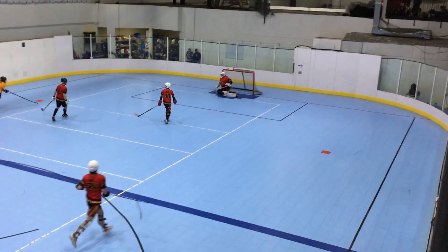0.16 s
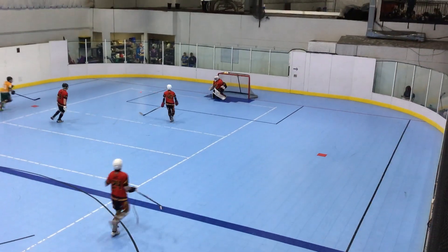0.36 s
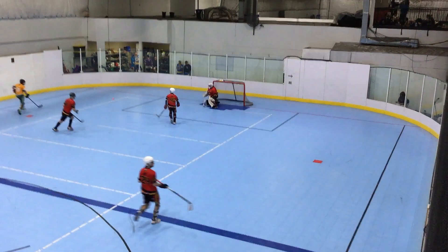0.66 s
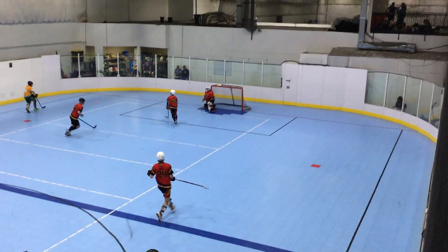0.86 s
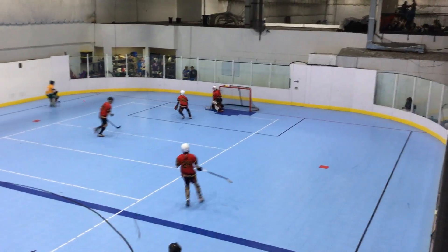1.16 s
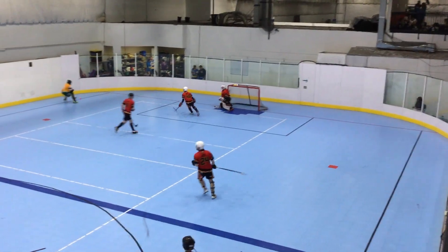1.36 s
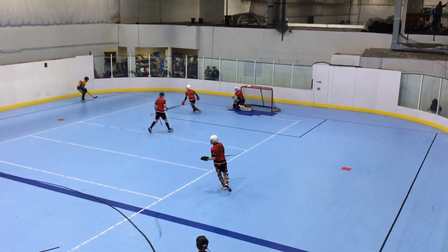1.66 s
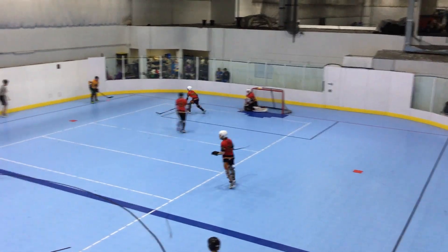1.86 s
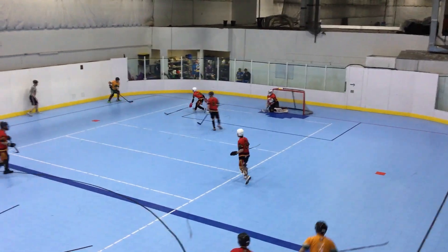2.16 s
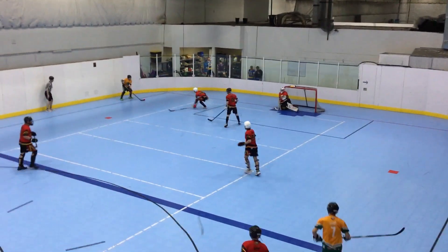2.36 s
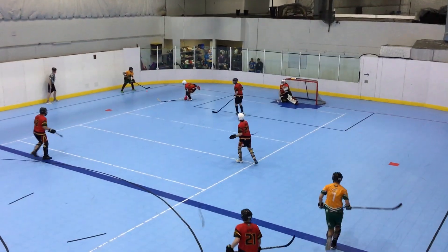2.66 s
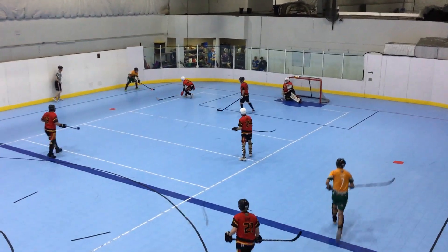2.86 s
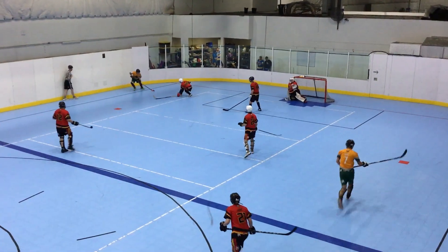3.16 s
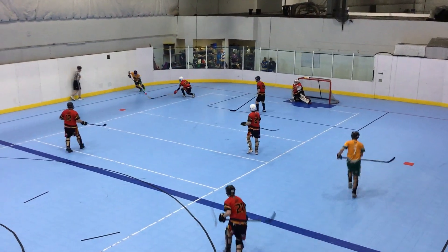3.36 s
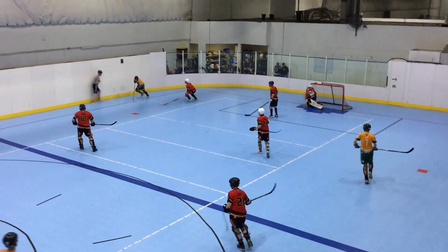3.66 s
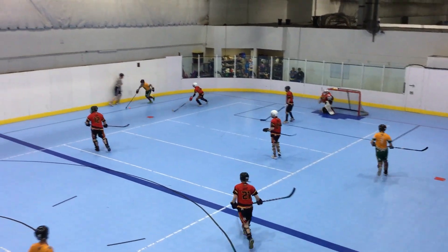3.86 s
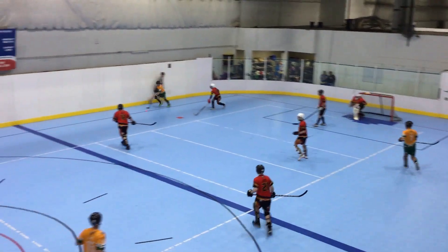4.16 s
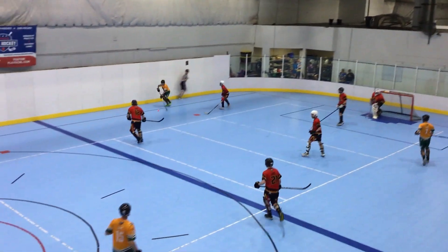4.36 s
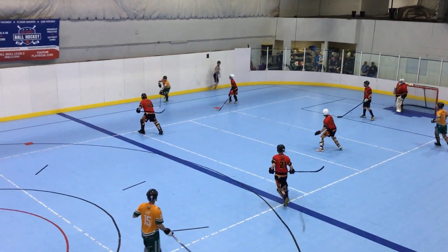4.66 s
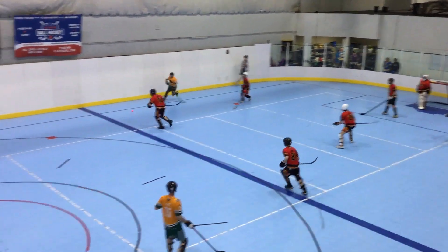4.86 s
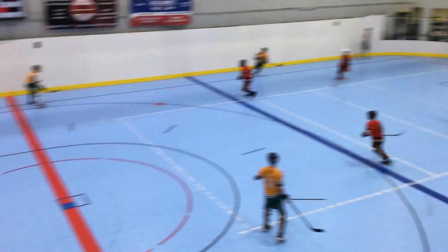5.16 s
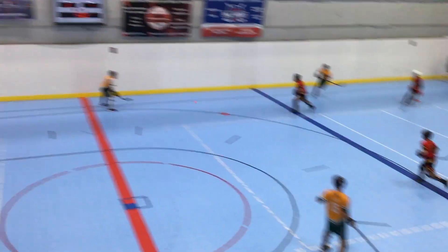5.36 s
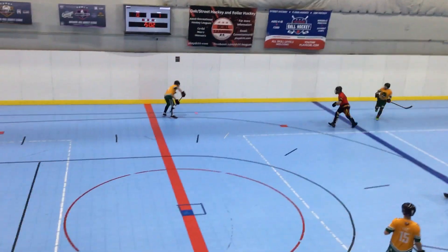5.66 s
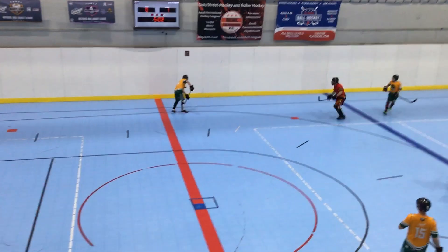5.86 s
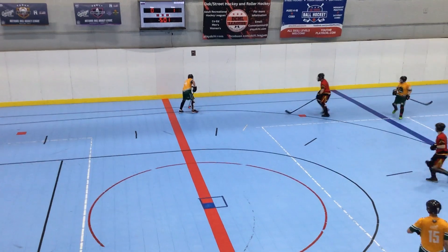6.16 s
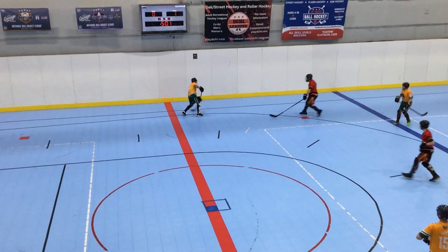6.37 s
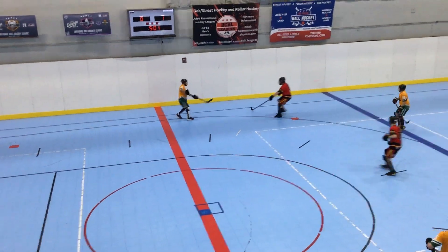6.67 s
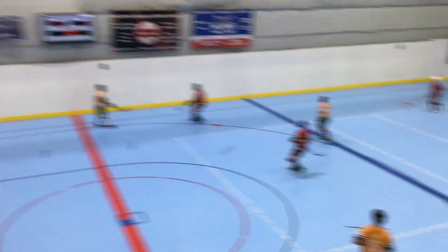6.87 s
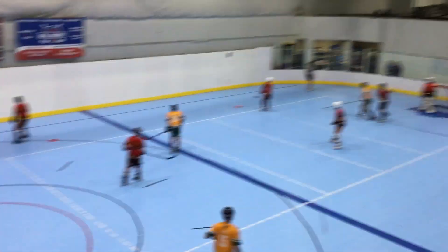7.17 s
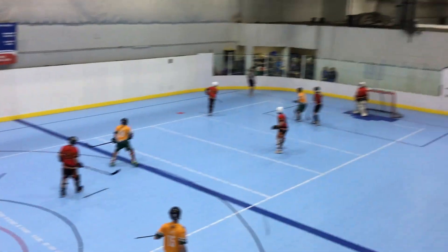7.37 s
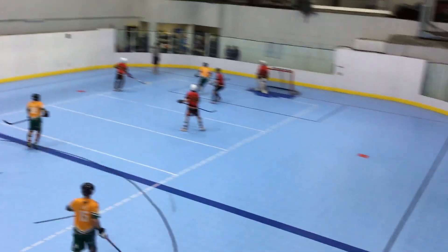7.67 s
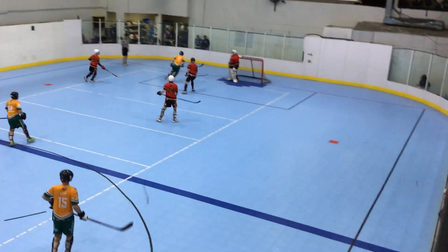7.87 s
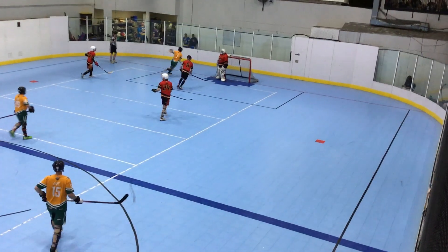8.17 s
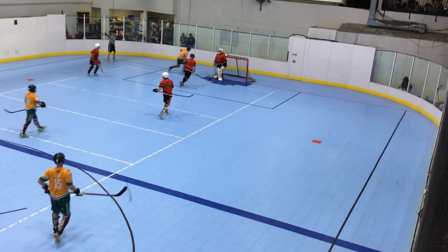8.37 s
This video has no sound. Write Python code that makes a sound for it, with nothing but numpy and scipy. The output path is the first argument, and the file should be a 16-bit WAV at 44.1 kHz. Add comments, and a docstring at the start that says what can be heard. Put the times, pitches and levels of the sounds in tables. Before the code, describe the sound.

Fingers bump and rub a camera housing in irregular thuds and clicks, while an echoing indoor ball hockey game clacks and squeaks faintly behind.

```python
"""A camera pans by hand above an indoor ball hockey court, over steady air noise, hiss and a low drone.
From the start, fingers and mount slip on its housing: each slip steps the pressure at the microphone,
and the camera's filters smear every step into a falling knock; skin rubs and rustles in between.
Far below in the echoing hall, shoes squeak as unsteady tones with an octave, and between them sticks
clack as noisy cracks with a damped ring; near the end a whistle blows four wavering tones."""
import sys
import numpy as np
from scipy import signal
from scipy.fft import rfft, irfft
from scipy.io import wavfile
from scipy.ndimage import uniform_filter1d

SR = 44100
rng = np.random.default_rng(int(sys.argv[2]) if len(sys.argv) > 2 else 0)


def gain_from_db(level_db):
    """Turn a decibel level (scalar or array-like) into a linear amplitude factor."""
    decades = np.asarray(level_db, float) / 20
    return 10 ** decades


def digitize_waveform(pressure):
    """Quantize a signal to 16-bit integers and store it at the path in sys.argv[1].

    Rows of a 2-D input are taken as channels; values are limited to [-1, 1].
    """
    field = np.atleast_2d(pressure).T
    bounded = np.clip(field, -1, 1)
    quanta = np.round(bounded * 32767).astype(np.int16)
    wavfile.write(sys.argv[1], SR, quanta)


N = 376173

# Unrest of the grip. Each row: time in seconds, slow rubbing in dB, fine unrest in dB.
GRIP = [(0, -44, -79.5), (.55, -50, -70), (1.0, -40, -74), (1.38, -42.5, -72.5), (2.09, -46, -77),
        (2.62, -52.5, -77.5), (3.16, -41.5, -77.5), (3.92, -44, -74.5), (4.44, -43.5, -75.5),
        (4.94, -40, -73.5), (5.5, -43.5, -81.5), (6.2, -51, -75.5), (6.75, -48, -82), (6.89, -48, -55.5),
        (7.1, -36, -65.5), (7.66, -42.5, -67.5), (7.85, -47, -80.5), (8.53, -44.5, -79.5)]
# Colour of the rubbing. Each row: frequency in Hz, relative density in dB.
RUBBING_COLOUR = [(20, 5.5), (40, 15.5), (70, 16.5), (120, -4), (250, -18.5), (500, -41), (1000, -59)]
# Colour of skin sliding. Each row: frequency in Hz, relative density in dB.
RUSTLE_COLOUR = [(150, -18), (300, 1), (700, -2), (1500, -15.5), (4000, -32.5), (9000, -40.5)]
# Colour of air noise and hiss. Each row: frequency in Hz, relative density in dB.
HISS_COLOUR = [(180, -32), (300, -4), (419, -11.5), (644, -13.5), (1060, -15.5), (2580, -22.5),
               (9070, -30.5), (12300, -36.5), (13500, -60.5)]
# Colour of the building drone. Each row: frequency in Hz, relative density in dB.
RUMBLE_COLOUR = [(20, -1), (35, -2.5), (50, 4), (70, -18.5), (100, -40), (200, -60)]
HISS_DB, RUMBLE_DB = -78.5, -51
RUSTLE_OVER_UNREST_DB, TINY_OVER_UNREST_DB = -6.5, 26.5

# Crisp slips of the mount. Each row: start in seconds, pressure step in dB, direction +1 or -1,
# sudden share 0-1, edge in Hz.
SNAPS = [(.0776, -7, 1, 0.13, 1990), (0.1739, -21, 1, 0.25, 1975), (.26, -17.5, 1, 0.27, 3794),
         (0.6655, -18.5, -1, 0.3, 3236), (0.7413, -24, 1, 0.29, 2366), (.8101, -17, -1, 0.27, 4000),
         (0.964, -2, -1, .13, 1810), (1.1737, -27.5, -1, 0.18, 4101), (1.2312, -25, 1, 0.32, 4172),
         (1.3339, -10, 1, 0.33, 3000), (1.4155, -31.5, 1, 0.26, 3381), (1.4967, -22.5, 1, 0, 597),
         (2.094, -24, 1, 0.29, 3053), (2.4122, -14, 1, .26, 4050), (2.8857, -35, 1, 0.5, 1011),
         (3.1227, -5, 1, 0.24, 2440), (3.23, -9.5, 1, 0.27, 3180), (3.661, -34, 1, 0.22, 3580),
         (3.9505, -34, 1, 0.47, 1103), (4.6953, -30, 1, .01, 3870), (4.8469, -31.5, 1, 0.35, 3870),
         (5.344, -33, -1, 0.3, 3872), (5.9324, -12, -1, .3, 4460), (6.11, -23.5, -1, 0.23, 3077),
         (6.4481, -7.5, 1, .1, 2010), (6.846, -14, 1, 0.25, 4000), (6.8507, -18, -1, 0.05, 810),
         (6.9167, -24.5, -1, .02, 900), (6.973, -21, 1, 0.24, 3948), (7.0771, -16.5, 1, .08, 1010),
         (7.191, -24.5, 1, 0, 4669), (7.2011, -17, 1, .1, 1100), (7.2952, -32, 1, 0.1, 4941),
         (7.31, -3, 1, 0.32, 4630), (7.3834, -5, 1, 0.18, 2710), (7.471, -16.5, -1, .3, 3920),
         (7.5508, -29.5, -1, 0.24, 4630), (7.5747, -7.5, -1, 0.16, 3498), (7.5786, -2.5, -1, 0.21, 2340),
         (7.5827, -3, -1, 0.06, 2180), (7.5892, -8, -1, 0.15, 3000), (7.6913, -16, 1, .23, 3350)]
# Padded bumps of a finger. Each row: start in seconds, pressure step in dB, direction +1 or -1,
# creep time in ms, sudden share 0-1.
BUMPS = [(.0094, -22.5, 1, 1.03, 0), (0.2401, -8.5, -1, 3.3, 0.1), (.296, -41, 1, .6, .5),
         (0.7256, -19.5, -1, 1.4, .05), (1.129, -42, 1, .6, 0.9), (1.534, -42, 1, 0.68, 0.4),
         (1.649, -36.5, 1, 0.49, 0.4), (1.767, -46, 1, .6, .5), (1.808, -41.5, 1, 0.5, 0.5),
         (1.8737, -33, -1, 0.65, 0.44), (1.92, -41, 1, .6, .6), (2.264, -48, 1, .6, .6),
         (2.365, -41, 1, .6, 0.4), (2.434, 5, 1, 2.33, 0.13), (2.595, -36.5, 1, .6, 0.6),
         (2.6613, 1.5, 1, 0.58, 0.79), (2.8332, -24.5, -1, 0.59, .01), (2.865, -37, 1, .6, 0.4),
         (3.497, -40, 1, 0.72, 0.8), (3.528, -42, 1, 0.67, 0.8), (3.9021, -14.5, -1, 0.64, .01),
         (4.103, -41.5, 1, .6, .7), (4.2842, -21, 1, 1.2, 0), (4.4167, -24, -1, 0.96, 0.14),
         (4.7979, -21, -1, 0.82, .01), (4.9583, -27, 1, 1.2, 0.37), (5.0333, -14, 1, .4, 0.72),
         (5.0887, -20, -1, 1.1, .01), (5.725, -43.5, 1, .6, 0.4), (6.401, -39, 1, .6, .5),
         (6.653, -30.5, 1, 1.1, 0.05), (6.8834, 1.7, -1, 1.34, 0.38), (6.9095, -1, -1, 0.82, 0.2),
         (6.9651, -18.5, -1, 0.68, 0), (7.1172, -21.5, 1, 1.4, 0.27), (7.2421, -13, 1, 0.2, 0.77),
         (7.7354, -27.5, -1, 0.9, 0), (7.9479, 9.5, -1, 6, 0.05), (8.235, -32.5, 1, 0.75, .1)]
# Slow squeezes of the palm. Each row: middle of the build-up in seconds, pressure step in dB,
# direction +1 or -1, build-up in ms.
SQUEEZES = [(0.5334, -17, -1, 3.4), (1.0455, -13.5, -1, 5.7), (1.7075, -12.5, 1, 2.4),
            (1.9333, -16, -1, 2.3), (2.457, -11, -1, 3.8), (2.8425, -11, -1, 5), (2.8516, -15, 1, 4.6),
            (3.601, -7, 1, 7.3), (3.895, -5.5, -1, 2), (3.9107, -9, -1, 6.3), (3.927, -14, -1, 6.6),
            (4.0499, -8.5, 1, 6.9), (4.2, -18.5, 1, 5.1), (4.2898, -11, -1, 5.3), (4.4169, -23, -1, 5),
            (4.5044, -19.5, -1, 7), (4.7435, -24, 1, 6), (4.804, -2, 1, 3.1), (4.8353, -5, 1, 6.6),
            (4.89, -14, 1, 4.4), (4.9056, -7, -1, 6), (4.929, -16, 1, 4), (4.9433, -14, -1, 4),
            (4.9585, -18, 1, 4.8), (4.981, -14, -1, 6.9), (5.0984, -10.5, 1, 3.3), (5.2838, -16, -1, 4.9),
            (5.498, -15, -1, 9.2), (5.59, -15, -1, 7.3), (6.6676, -14, 1, 8), (6.721, -9, 1, 5.6),
            (6.742, -5.5, -1, 13), (6.871, -8, -1, 2.8), (6.937, -10.5, 1, 1.8), (6.9948, -9, 1, 1.8),
            (7.0056, -12.5, 1, 3), (7.0166, -8, 1, 1.7), (7.0413, -14.5, -1, 4), (7.085, -7, -1, 4.5),
            (7.104, -13, -1, 3.5), (7.1272, -13, -1, 1.6), (7.1477, -14, 1, 5), (7.1738, -15, 1, 3.6),
            (7.265, -13, -1, 6.5), (7.4188, -13.5, 1, 5), (7.4965, -13, -1, 5), (7.5283, -3.5, -1, 6),
            (7.535, -9, 1, 4), (7.554, -4.5, 1, 4.5), (7.6448, -18, 1, 4), (8.2258, -14, -1, 6.1),
            (8.4142, -18, 1, 5.8), (8.432, -19, -1, 7.7)]
# Slip within each squeeze: creep time in ms, sudden share 0-1, edge in Hz.
SQUEEZE_SHAPE = (3.37, 0.054, 173)
# Faint ticks. Each row: start in seconds, pressure step in dB.
TICKS = [(.1296, -46), (.2036, -38.5), (.3561, -39.5), (.4193, -49), (.5145, -36), (.5228, -31),
         (.5598, -39), (.586, -40.5), (.7038, -39), (.7667, -36.5), (.7913, -36), (1.1568, -33.5),
         (1.2008, -34.5), (1.2569, -38), (1.2616, -40), (1.307, -38), (1.345, -37), (1.446, -42),
         (1.455, -40), (1.6366, -36), (1.746, -35.5), (2.0439, -36), (2.0887, -43.5), (2.1977, -36),
         (2.5239, -42), (2.931, -39), (3.084, -41), (3.2605, -39), (3.653, -32.5), (3.79, -33),
         (4.1662, -39), (4.1907, -44), (4.4431, -42), (4.5307, -39), (4.5638, -44), (4.92, -39),
         (4.9782, -41), (5.116, -38.5), (5.232, -37.5), (5.461, -41), (5.6804, -43), (5.8015, -41),
         (6.1206, -39.5), (6.22, -38), (6.293, -33), (6.357, -43), (6.7444, -38.5), (6.7935, -38.5),
         (6.8333, -28), (6.8392, -38), (6.891, -37), (6.8997, -39), (6.9231, -40), (6.932, -38),
         (6.9476, -41.5), (6.9899, -36), (7.011, -40), (7.046, -38), (7.0692, -35), (7.1113, -35),
         (7.1271, -35.5), (7.1689, -39), (7.1883, -30), (7.3238, -38), (7.433, -45), (7.51, -46),
         (7.5683, -28), (7.664, -37), (7.8795, -43), (8.3433, -43.5)]
# Slip of every tick: creep time in ms, sudden share 0-1, edge in Hz.
TICK_SHAPE = (0.88, 0.24, 3800)
# Equally likely kinds of tiny slip. Each row: creep time in ms, sudden share 0-1, edge in Hz.
TINY_SHAPES = [(1.2, 0.11, 3040), (1.5, 0, 792), (3, 0.11, 241), (6, 0.08, 165.7)]
TINY_PER_S, TINY_SPREAD_DB = 140, 4
SNAP_CREEP_MS, BUMP_EDGE_HZ = .52, 300
SECOND_EDGE_RATIO = 5.6  # second rounding, as a multiple of the edge

# Rubber soles on the court. Each row: start in seconds, length in seconds, pitch in Hz,
# level of the fundamental in dB, second harmonic over it in dB.
SQUEAKS = [(.32, .34, 745, -95, 5), (.7, .25, 760, -90, 3), (1.8, .25, 2520, -97, -20),
           (2.75, .38, 2270, -95, -20), (4.2, .17, 2280, -97, -20), (5.4, .2, 1530, -96, -20),
           (5.72, .17, 1550, -96, -20), (6.25, .1, 1950, -96, -20)]
# Sticks on ball and court. Each row: start in seconds, peak of the ring in dB, main ring in Hz.
CLACKS = [(1.377, -56, 1700), (2.042, -68, 2500), (2.636, -56, 2350), (2.899, -63, 3750),
          (3.995, -66, 4000), (4.21, -68, 3000), (6.232, -64, 2000)]
# Modes of the blade. Each row: ratio to the main ring, relative level in dB, t60 in seconds.
BLADE_MODES = [(.5, -8, .015), (.7, -4, .015), (1, 0, .015), (1.25, -4, .012), (1.67, -5, .012),
               (2.1, -18, .008)]
CRACK_DB, CRACK_DECAY_MS = 3, 4  # noisy first contact
# Whistle chambers. Each row: frequency in Hz, relative level in dB.
WHISTLE_CHAMBERS = [(2430, -7.5), (2490, 0), (2570, -5), (2655, 0)]
BLOW_START_S, BLOW_DB, BLOW_RISE_S, BLOW_HOLD_S = 7.61, -87.5, .02, .35  # hold counts from the start
BLOW_FADE_DB_PER_S, BLOW_PATCHY_DB = 25, 3
# Decay of the hall. Each row: frequency in Hz, t60 in seconds.
HALL_DECAY = [(500, 2.1), (2000, 1.8), (5000, 1.3), (10000, .6)]
TONE_ECHO_DB, CLACK_ECHO_DB = -8.5, 2  # echo gain relative to the direct sound

TOP_HZ, TOP_Q = 14900, 0.5  # treble roll-off
# Microphone port. Each row: frequency in Hz, Q, gain in dB.
PORT = [(472, 4.5, -2.5), (652, 2.7, 2), (976, 0.84, -4.5), (4540, 2.7, 1.5)]
# Second-order high-passes. Each row: frequency in Hz, Q.
LOW_CUTS = [(66, 1.9), (165, 0.59)]
# Band splits that delay the lows. Each row: frequency in Hz, Q.
CROSSOVERS = [(77, 0.64), (686, .6)]


def evened(x):
    """Scales to rms 1."""
    return x / np.sqrt(np.mean(x ** 2) + 1e-20)


def read(points, hz):
    """Reads a table on a log-frequency axis."""
    f, value = np.transpose(points)
    return np.interp(np.log(hz + 1), np.log(f + 1), value)


def curve(rows, column):
    """One column of a table, sample by sample."""
    columns = np.transpose(rows)
    return np.interp(np.arange(N) / SR, columns[0], columns[column])


def add(mix, start_s, sound):
    """Mixes a sound in at a given time."""
    part = mix[round(start_s * SR):][:len(sound)]
    part += sound[:len(part)]


def wander(size):
    """Slow random drift of rms 1: white noise averaged twice over size samples."""
    once = uniform_filter1d(rng.standard_normal(N), size)
    return evened(uniform_filter1d(once, size))


def noise(colour):
    """Steady noise of a given colour, rms 1."""
    hz = np.fft.rfftfreq(N, 1 / SR)
    spectrum = rfft(rng.standard_normal(N)) * gain_from_db(read(colour, hz))
    return evened(irfft(spectrum, N))


def section(x, hz, q, zeros):
    """A second-order filter; zeros are the numerator in powers of s / (2 pi hz)."""
    scale = (2 * np.pi * hz) ** -np.arange(2., -1, -1)
    b, a = signal.bilinear(np.multiply(zeros, scale), np.multiply([1, 1 / q, 1], scale), SR)
    return signal.lfilter(b, a, x)


def lag(x, hz):
    """One-pole smoothing of gain 1."""
    pole = np.exp(-2 * np.pi * hz / SR)
    return signal.lfilter([1 - pole], [1, -pole], x)


def rubbing():
    """Skin moving on the housing: a lumpy low rumble."""
    level_db = curve(GRIP, 1) + 2.7 * wander(size=900)
    return noise(RUBBING_COLOUR) * gain_from_db(level_db)


def rustle():
    """Skin sliding between slips: a grainy noise that follows the unrest of the grip."""
    level_db = curve(GRIP, 2) + RUSTLE_OVER_UNREST_DB + 4.6 * wander(size=120)
    return noise(RUSTLE_COLOUR) * gain_from_db(level_db)


def hiss():
    """Air handling of the hall, microphone hiss and the low drone of the building."""
    return noise(HISS_COLOUR) * gain_from_db(HISS_DB) + noise(RUMBLE_COLOUR) * gain_from_db(RUMBLE_DB)


def slip(creep_ms, sudden, edge_hz, size=4096):
    """Rate of change of pressure in a unit step: part at once, the rest creeping, both rounded above the edge."""
    start = signal.unit_impulse(size)
    creep = lag(start, 1000 / (2 * np.pi * creep_ms))
    change = sudden * start + (1 - sudden) * creep
    return lag(lag(change, edge_hz), SECOND_EDGE_RATIO * edge_hz)


def squeeze(build_ms):
    """A slip spread smoothly over the time that the palm takes to close."""
    count = max(int(build_ms * SR / 1000), 3)
    rise = np.sin(np.linspace(0, np.pi, count)) ** 2
    return np.convolve(slip(*SQUEEZE_SHAPE), rise / rise.sum())


def jolts():
    """Snaps, bumps, squeezes, ticks and a crackle of tiny slips add up to a staircase of pressure."""
    change = np.zeros(N)
    for s, db, direction, sudden, edge_hz in SNAPS:
        add(change, s, gain_from_db(db) * direction * slip(SNAP_CREEP_MS, sudden, edge_hz))
    for s, db, direction, creep_ms, sudden in BUMPS:
        add(change, s, gain_from_db(db) * direction * slip(creep_ms, sudden, BUMP_EDGE_HZ))
    for s, db, direction, build_ms in SQUEEZES:
        add(change, s - build_ms / 2000, gain_from_db(db) * direction * squeeze(build_ms))
    chance, kind, side = rng.random((N, 3)).T
    random_direction = np.sign(side - .5)
    for s, db in TICKS:
        add(change, s, gain_from_db(db) * random_direction[round(s * SR)] * slip(*TICK_SHAPE))
    spread_db = TINY_SPREAD_DB * np.minimum(rng.exponential(1, N), 3)
    size_db = curve(GRIP, 2) + TINY_OVER_UNREST_DB + spread_db
    tiny = gain_from_db(size_db) * random_direction * (chance < TINY_PER_S / SR)
    kind = (kind * len(TINY_SHAPES)).astype(int)
    for k, shape in enumerate(TINY_SHAPES):
        change += signal.oaconvolve(tiny * (kind == k), slip(*shape))[:N]
    return np.cumsum(change)


def squeaks():
    """Fast stick and slip of rubber: an unsteady tone with its octave."""
    out = np.zeros(N)
    unsteady = 1 + .012 * wander(size=300)
    for s, length_s, hz, db, octave_db in SQUEAKS:
        count = round(length_s * SR)
        phase = 2 * np.pi * np.cumsum(hz * unsteady[round(s * SR):][:count]) / SR
        tone = np.sin(phase) + gain_from_db(octave_db) * np.sin(2 * phase)
        add(out, s, gain_from_db(db) * np.sqrt(2) * tone * signal.windows.tukey(count, .4))
    return out


def clacks():
    """Each blow is a short crack that rings the damped blade."""
    out = np.zeros(N)
    t = np.arange(SR // 20) / SR
    grit = rng.standard_normal((len(CLACKS), len(t)))
    for (s, peak_db, hz), rough in zip(CLACKS, grit):
        ring = sum(gain_from_db(db - 60 * t / t60) * np.sin(2 * np.pi * hz * ratio * t)
                   for ratio, db, t60 in BLADE_MODES)
        band = section(rough, .7 * hz, 0.87, [0, 1, 0])  # band-pass
        band = section(band, 1.2 * hz, 0.57, [0, 0, 1])  # low-pass
        crack = band * np.exp(-t * 1000 / CRACK_DECAY_MS)
        add(out, s, gain_from_db(peak_db) * (ring / abs(ring).max() + gain_from_db(CRACK_DB) * crack))
    return out


def whistle():
    """The chambers sound together and waver with the air flow, which rises, holds unevenly and fades."""
    flow = 1 + 0.0044 * wander(size=400)
    t = np.arange(N) / SR - BLOW_START_S
    tones = sum(gain_from_db(db) * np.sin(2 * np.pi * np.cumsum(hz * flow) / SR) for hz, db in WHISTLE_CHAMBERS)
    fade_db = BLOW_FADE_DB_PER_S * np.maximum(t - BLOW_HOLD_S, 0)
    level_db = BLOW_DB - fade_db + BLOW_PATCHY_DB * wander(size=700)
    return evened(tones) * np.clip(t / BLOW_RISE_S, 0, 1) * gain_from_db(level_db)


def hall(x):
    """Dense echoes, as decaying noise that builds up over 30 ms, treble dying first."""
    hz, t, z = signal.stft(rng.standard_normal(2 * SR), SR, nperseg=256)
    decay = gain_from_db(-60 * t / read(HALL_DECAY, hz)[:, None])
    z = z * decay * np.clip(t / .03, 0, 1)
    tail = signal.istft(z, SR, nperseg=256)[1]
    return signal.fftconvolve(x, tail / np.linalg.norm(tail))[:N]


def scene():
    """Handling at the microphone over the distant game."""
    blows = clacks()
    tones = squeaks() + whistle()
    echoes = hall(gain_from_db(CLACK_ECHO_DB) * blows + gain_from_db(TONE_ECHO_DB) * tones)
    game = blows + tones + echoes
    return (jolts() + rubbing() + rustle() + hiss() + game)[None]


def low_pass(x):
    """Removes everything above the highest recorded frequency."""
    return signal.sosfilt(signal.butter(12, 15700, fs=SR, output="sos"), x)


def record(dry):
    """Low cuts remove the steady pressure; the band splits make the lows of each jolt arrive late."""
    x = section(dry, TOP_HZ, TOP_Q, [0, 0, 1])
    for hz, q, db in PORT:
        x = section(x, hz, q, [1, gain_from_db(db) / q, 1])
    for hz, q in LOW_CUTS:
        x = section(x, hz, q, [1, 0, 0])
    for hz, q in CROSSOVERS:
        x = section(x, hz, q, [1, -1 / q, 1])  # all-pass
    return low_pass(x)


dry = scene()
out = record(dry)
digitize_waveform(out)
```